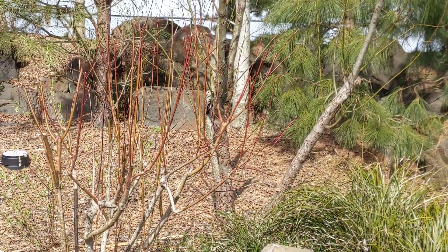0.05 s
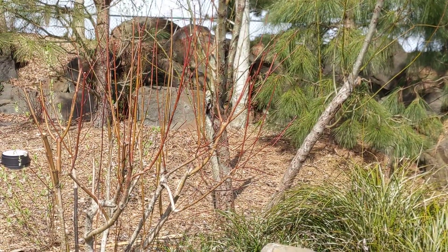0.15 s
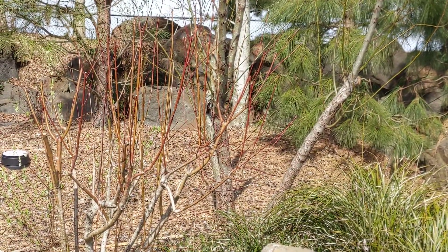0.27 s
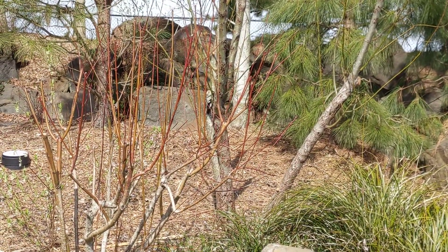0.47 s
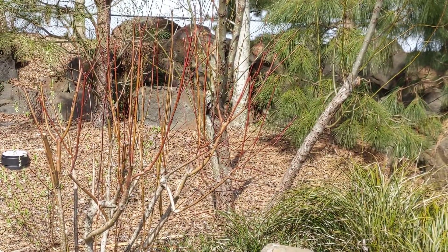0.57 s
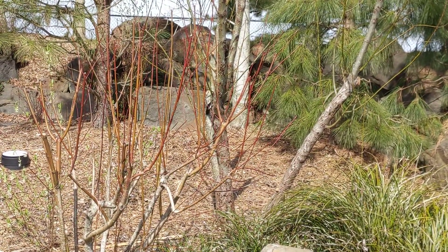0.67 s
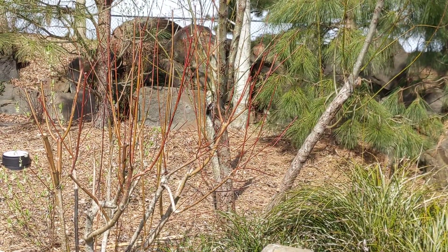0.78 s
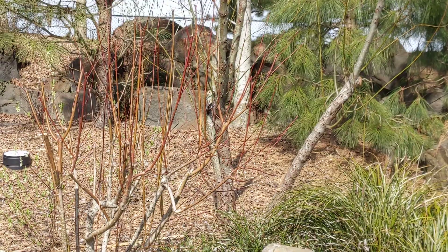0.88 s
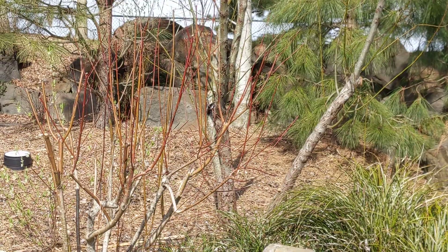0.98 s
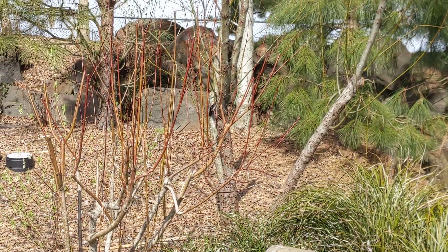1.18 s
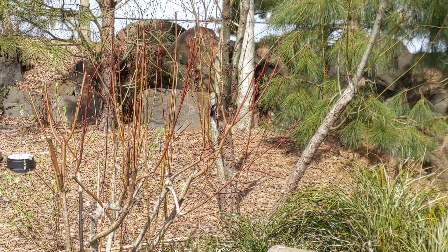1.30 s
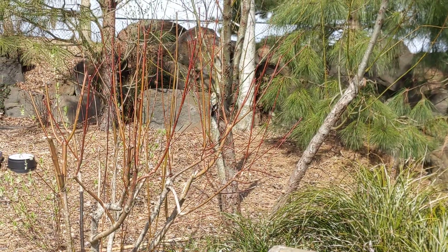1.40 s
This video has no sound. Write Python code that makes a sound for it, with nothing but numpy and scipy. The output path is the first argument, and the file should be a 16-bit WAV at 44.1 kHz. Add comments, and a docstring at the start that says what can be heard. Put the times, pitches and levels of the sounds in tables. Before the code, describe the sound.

A hand-held camera is bumped twice, close and hollow, in a quiet garden with faint birds.

```python
"""A quiet garden, from the stereo microphones of a hand-held camera. Low rumble, outdoor air, hiss and faint
drones run throughout; far birds cry and a nearer one chirps from the start as the camera sways in the hand. At
0.23 s and 0.33 s, right at the microphones, two knocks ring the hollow case for a few cycles; its plastic ticks
and a finger brushes over it. From 1.1 s the fingers nudge it lightly three times, while a bird gives one thin,
two-note whistle."""
import sys
import numpy as np
from scipy import signal
from scipy.io import wavfile
from scipy.ndimage import uniform_filter1d

SR = 44100
rng = np.random.default_rng(int(sys.argv[2]) if len(sys.argv) > 2 else 0)


def unload_wav(signal):
    """Save mono or channel-first audio to the path in sys.argv[1] as 16-bit WAV at rate SR, clipped to [-1, 1]."""
    wavfile.write(
        sys.argv[1],
        SR,
        np.round(np.clip(np.atleast_2d(signal).T, -1, 1) * 32767).astype(np.int16),
    )


N = 63945


def amp(db):
    """Decibels to gain."""
    return 10 ** (np.asarray(db) / 20)


def unit(x):
    """Scales to rms 1."""
    return x / np.sqrt(np.mean(x ** 2) + 1e-20)


def read(points, hz):
    """Reads a spectrum table on a log-frequency axis."""
    f, value = np.transpose(points)
    return np.interp(np.log(hz + 1), np.log(f + 1), value)


def pan(db):
    """Microphone gains, the left louder than the right by db."""
    return amp(np.array([np.atleast_1d(db), -np.atleast_1d(db)]) / 2)


def add(mix, start_s, sound):
    """Mixes a sound in at its start time."""
    part = mix[:, max(round(start_s * SR), 0):][:, :sound.shape[-1]]
    part += sound[..., :part.shape[1]]


def noise(colour, balance, likeness=None, *, patch_db, size=1024):
    """Stereo noise of a given colour at rms 1, with drifting patches of level."""
    hz, frames = np.fft.rfftfreq(size, 1 / SR), N * 4 // size + 6
    a, b, c, d, patches = rng.standard_normal((frames, len(hz), 5)).T
    patches = unit(uniform_filter1d(uniform_filter1d(patches, size=6, axis=0), size=10, axis=1))
    same = np.clip(read(likeness, hz), -1, 1)[:, None] if likeness else 0
    left = a + 1j * b
    right = same * left + np.sqrt(1 - same ** 2) * (c + 1j * d)
    gain = amp(read(colour, hz)[:, None] + patch_db * patches) * pan(read(balance, hz))[:, :, None]
    _, sound = signal.istft(np.array([left, right]) * gain, nperseg=size, noverlap=size * 3 // 4)
    return unit(sound[:, :N])


# Low outdoor rumble: frequency_hz, relative_db
RUMBLE_COLOUR = [(15, -6.5), (28, 1), (42, -11), (62, 2.5), (90, -3.5), (130, -17.5), (250, -27.5),
                 (1000, -88)]
# Open garden air: frequency_hz, relative_db
AIR_COLOUR = [(15, -9), (62, -7), (120, -8.5), (170, -14), (220, -14), (330, -19), (480, -20), (720, -27.5),
              (870, -20), (1000, -20), (1150, -28), (1750, -28), (2300, -37.5), (3500, -38.5),
              (6000, -49.5), (16000, -60)]
# Balance at the microphones, also for the low drones and the finger: frequency_hz, left_over_right_db
MIC_BALANCE = [(60, 1.5), (200, 1.9), (500, 5), (1000, 2.5), (1700, 8), (2500, 1.5), (8000, -3.5)]
# How alike the two microphones hear the outdoors: frequency_hz, correlation
MIC_LIKENESS = [(60, 0.96), (130, 0.97), (290, 0.19), (640, 0.083), (1400, 0.46), (3000, 0.031)]
def outdoor_air():
    """Low rumble and gently swelling air, all round the microphones."""
    t = np.arange(N) / SR
    swell = unit(sum(np.sin(2 * np.pi * (hz * t + rng.random())) / np.sqrt(hz)
                     for hz in np.geomspace(1, 9, 20)))
    air = noise(AIR_COLOUR, MIC_BALANCE, MIC_LIKENESS, patch_db=2.5, size=2048)
    rumble = noise(RUMBLE_COLOUR, MIC_BALANCE, MIC_LIKENESS, patch_db=0.5, size=4096)
    return amp(-60.5) * rumble + amp(-61 + 0.9 * swell) * air


# The microphones' own noise: frequency_hz, relative_db
HISS_COLOUR = [(1000, -11.5), (4000, 1.5), (4900, -3), (5750, 5.5), (6600, -5), (7600, 0), (8500, -6),
               (9700, -2.5), (11500, -6), (13800, 0.5), (15500, -10.5), (16400, -46)]
# Its lean to the left: frequency_hz, left_over_right_db
HISS_BALANCE = [(3000, 2), (5500, 7), (8000, 10), (15000, 14.5)]
def microphone_hiss():
    """Soft, steady hiss from the microphones themselves."""
    return amp(-74) * noise(HISS_COLOUR, HISS_BALANCE, patch_db=1.8)


def drone(hz, db, waver):
    """A tone that drifts slowly about its pitch."""
    drift = unit(uniform_filter1d(uniform_filter1d(rng.standard_normal(N), size=1200), size=600))
    return amp(db) * np.sin(2 * np.pi * np.cumsum(hz * (1 + waver * drift)) / SR)


# Faint drones in the distance: pitch_hz, level_db, waver_fraction
LOW_DRONES = [(59, -63.5, 0.025), (165.9, -70, 0.019), (330.2, -75, 0.0066)]
def low_drones():
    """Three low hums at a steady level, far off and a little to the left."""
    return sum(drone(hz, db, waver) * pan(read(MIC_BALANCE, hz)) for hz, db, waver in LOW_DRONES)


# The course of a distant tone: time_s, pitch_hz, level_db
FAR_TONE_PATH = [(0, 1060, -92), (0.088, 920, -80), (0.139, 1029, -76.5), (0.299, 962, -72),
                 (.42, 1031, -83), (.5, 980, -84), (.69, 1020, -70.5), (0.749, 950, -77),
                 (0.818, 1035, -71.5), (0.878, 970, -72.5), (.98, 1009, -69), (1.04, 1000, -83),
                 (1.13, 1036, -70), (1.289, 926, -82), (1.43, 1003, -69)]
def far_tone():
    """A tone far off to the left swells and fades as it wavers about 1 kHz."""
    time_s, hz, db = np.transpose(FAR_TONE_PATH)
    t = np.arange(N) / SR
    return drone(np.interp(t, time_s, hz), np.interp(t, time_s, db), waver=0.0123) * pan(6)


def bird_note(hz, db, waver):
    """A nearly pure, slightly unsteady tone that swells and fades."""
    drift = unit(uniform_filter1d(rng.standard_normal(N), size=120))[:len(hz)]
    swell = np.sin(np.linspace(0, np.pi, len(hz)))
    return amp(db) * swell * np.sin(2 * np.pi * np.cumsum(hz * (1 + waver * drift)) / SR)


# The farthest birds: start_s, length_s, level_db, middle_pitch_hz, glide_hz
FAR_CRIES = [(0, 0.075, -73.5, 1385, 7), (0, 0.053, -69, 1590, -56), (0.099, 0.08, -71.5, 1815, -14),
             (0.245, 0.05, -74, 1980, 27), (0.29, 0.081, -68, 1345, -150), (0.319, 0.112, -73, 1700, 136),
             (0.411, 0.051, -72, 1600, -140), (0.398, .045, -76, 2110, 120),
             (0.504, 0.059, -77, 1480, -170), (0.543, 0.048, -78, 1665, 49), (0.616, 0.14, -81, 2050, 9),
             (.72, 0.14, -81.5, 1880, 87), (0.809, .11, -72.5, 1690, -86),
             (0.869, 0.063, -68.5, 1250, -106), (0.873, 0.073, -71, 1815, -56),
             (0.882, 0.052, -76, 2710, -3), (0.913, 0.078, -70, 1685, 33), (1.12, 0.053, -80, 2480, 63),
             (1.111, 0.053, -73, 1745, 0), (1.139, 0.077, -70.5, 1505, -150), (1.23, .1, -80, 1890, 66),
             (1.33, 0.08, -72.5, 1920, -14)]
def bird_cries(arch_fraction=0.0581):
    """Short cries from far off to the left, each arching up and down in pitch."""
    out = np.zeros((2, N))
    for start_s, length_s, db, hz, glide_hz in FAR_CRIES:
        progress = np.linspace(-1, 1, int(length_s * SR))
        pitch = hz * (1 - arch_fraction * progress ** 2) + glide_hz * progress / 2
        add(out, start_s, bird_note(pitch, db, waver=0.013))
    return out * pan(10.5)


def garden_echoes(sound, t60_s=0.12):
    """Scattered echoes from the trees and rocks round the microphones."""
    t = np.arange(SR // 2) / SR
    tail = rng.standard_normal((2, len(t))) * amp(-60 * t / t60_s)
    tail /= np.linalg.norm(tail, axis=1, keepdims=True)
    return signal.fftconvolve(sound, tail, axes=1)[:, :N]


def swing(rise_s):
    """Times and envelope of a swing that peaks at the rise time and dies away."""
    t = np.arange(SR // 10) / SR
    return t, (t / rise_s * np.exp(1 - t / rise_s)) ** 2.3


# The camera swaying in the hand: start_s, level_db, pitch_hz, rise_s
HAND_SWAYS = [(.01, -49.5, 57.7, 0.012), (0.172, -51, 66.4, 0.011), (0.229, -41.5, 30.2, 0.016),
              (.328, -45, 56.3, 0.013), (0.537, -48.5, 56.5, 0.013), (1.166, -46.5, 47.3, 0.012)]
def camera_sways():
    """The whole camera rocks, moving both microphones alike."""
    out = np.zeros((2, N))
    for start_s, db, hz, rise_s in HAND_SWAYS:
        t, envelope = swing(rise_s)
        add(out, start_s, amp(db) * envelope * np.sin(2 * np.pi * hz * t))
    return out


def gliding_call(notes, waver):
    """A nearer bird, almost centred, slides each note straight up or down."""
    out = np.zeros((2, N))
    for start_s, length_s, db, hz, glide_hz in notes:
        pitch = hz + glide_hz * np.linspace(0, 1, int(length_s * SR))
        add(out, start_s, bird_note(pitch, db, waver))
    return out * pan(1)


# Faint high chirps: start_s, length_s, level_db, pitch_hz, glide_hz
HIGH_CHIRPS = [(.015, 0.02, -69.5, 5420, 2014), (.025, 0.038, -77, 7770, -800),
               (.057, 0.019, -70.5, 5400, 1794)]
def bird_chirps():
    """Three quick chirps in the garden, roughened by an unsteady pitch."""
    return gliding_call(HIGH_CHIRPS, waver=0.055)


# Knocks and light nudges on the case: start_s, level_db, pitch_hz, rise_s, left_over_right_db
CASE_KNOCKS = [(0.2183, -41, 544, 0.0018, 7), (0.2267, -12.5, 534, 0.002, 2.5),
               (0.2456, -42, 320, 0.0018, 3), (0.316, -41.5, 464, 0.0016, 0.5),
               (0.3314, -32, 547, 0.0023, 4), (1.1324, -42, 406, 0.0014, 4), (1.2143, -35, 605, 0.00085, 4),
               (1.287, -43, 567, 0.00084, 4)]
def case_knocks(thump_hz=273, thump_db=-22, case_top_hz=813):
    """Right at the microphones, the hollow case rings for a few cycles over a duller thump."""
    out = np.zeros((2, N))
    phase_rad = 0.44 + np.array([[0], [2.43]])  # the case rocks: the microphones swing nearly opposed
    case_lowpass = signal.butter(8, case_top_hz, fs=SR, output="sos")
    for start_s, db, hz, rise_s, pan_db in CASE_KNOCKS:
        t, envelope = swing(rise_s)
        ring = np.cos(2 * np.pi * hz * t + phase_rad)
        thump = amp(thump_db) * np.cos(2 * np.pi * thump_hz * (t + rise_s) + phase_rad)
        knock = signal.sosfilt(case_lowpass, envelope * (ring + thump))
        add(out, start_s, amp(db) * pan(pan_db) * knock)
    return out


# Resonances of the plastic shell: frequency_hz, relative_db
SHELL_COLOUR = [(200, 5.5), (900, 15.5), (1150, -2.5), (1700, -0.5), (2700, 3), (4100, -2.5), (5700, -0.5),
                (6500, -4), (7700, 1), (16000, -3)]
# Ticks in the shell: start_s, level_db, left_over_right_db, centre_hz, body_db, treble_db, decay_s
SHELL_TICKS = [(0.2277, -26.5, -2.5, 2320, -3, -15.5, 0.00052),
               (0.2465, -37.5, -0.5, 3000, 4, -7.5, 0.00086), (0.2954, -48.5, -3, 8100, -28, 2, 0.00028),
               (0.3172, -41.5, 13, 5470, -10.5, -10, 0.00046)]
def plastic_ticks(body_hz=950, treble_hz=11700, size=1024):
    """Tiny cracks beside the microphones: duller from a fingertip, thinner from a nail."""
    out = np.zeros((2, N))
    t, hz = np.arange(size) / SR, abs(np.fft.fftfreq(size, 1 / SR))
    for start_s, db, pan_db, centre_hz, body_db, treble_db, decay_s in SHELL_TICKS:
        tilt_db = read([(body_hz, body_db), (centre_hz, 0), (treble_hz, treble_db)], hz)
        colour = amp(read(SHELL_COLOUR, hz) + tilt_db)
        shell = np.exp(np.conj(signal.hilbert(np.log(colour))))  # minimum phase keeps the onset sharp
        fade = np.exp(-t / decay_s)
        grit = np.fft.fft(rng.standard_normal((2, size)) * fade)
        even_grit = grit / np.hypot(unit(abs(grit)), .5)  # flattens chance peaks in the spectrum
        burst = np.roll(np.fft.ifft(shell * even_grit).real, size // 2, axis=1)
        burst *= np.linalg.norm(fade) / np.linalg.norm(burst, axis=1, keepdims=True)
        add(out, start_s - size / 2 / SR, amp(db) * pan(pan_db) * burst)
    return out


# A finger's stroke over the case: time_s, level_db
FINGER_STROKE = [(.25, -83.5), (.31, -65.5), (.341, -57.5), (.37, -56.5), (.421, -63.5), (.48, -71.5),
                 (.6, -90)]
# The finger rubbing on plastic: frequency_hz, relative_db
FINGER_COLOUR = [(100, -0.5), (330, -2), (540, 3), (850, -15.5), (2000, -18.5), (3800, -19.5),
                 (8000, -27.5), (16000, -30.5)]
def finger_brush():
    """Soft rubbing noise swells and fades as a finger passes close to the microphones."""
    level_db = np.interp(np.arange(N) / SR, *np.transpose(FINGER_STROKE))
    return amp(level_db) * noise(FINGER_COLOUR, MIC_BALANCE, patch_db=1.5)


# One whistled call: start_s, length_s, level_db, pitch_hz, glide_hz
WHISTLED_NOTES = [(1.168, 0.045, -72, 3080, -57), (1.283, 0.11, -63.5, 3024, 34)]
def bird_whistle():
    """Two thin, almost pure notes near 3 kHz, from closer than the cries."""
    return gliding_call(WHISTLED_NOTES, waver=0.0016)


def scene(near_echo_db=-12.5, far_echo_db=-11.5):
    """From the camera's case outwards: handling, birds, far drones and the background."""
    handling = finger_brush() + camera_sways() + case_knocks() + plastic_ticks()
    near, far = bird_whistle() + bird_chirps(), bird_cries()
    birds = near + far + garden_echoes(amp(near_echo_db) * near + amp(far_echo_db) * far)
    tone = far_tone()
    drones = low_drones() + tone + amp(far_echo_db) * garden_echoes(tone)
    return handling + birds + drones + outdoor_air() + microphone_hiss()


def record(dry):
    """The camera's recorder cuts off the treble above 16.3 kHz."""
    lowpass = signal.firwin(511, 16300, window=("kaiser", 9), fs=SR)
    return signal.oaconvolve(dry, lowpass[None], "same")


dry = scene()
out = record(dry)
unload_wav(out)
```